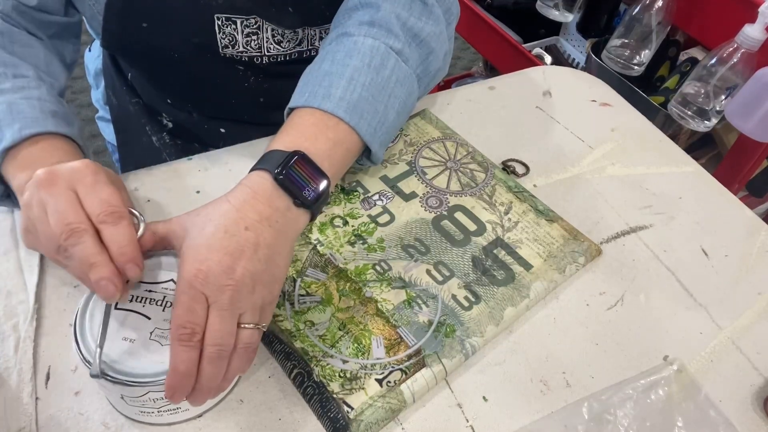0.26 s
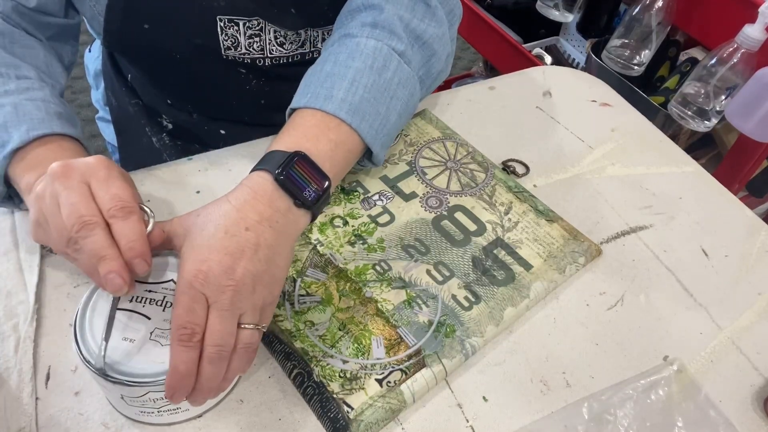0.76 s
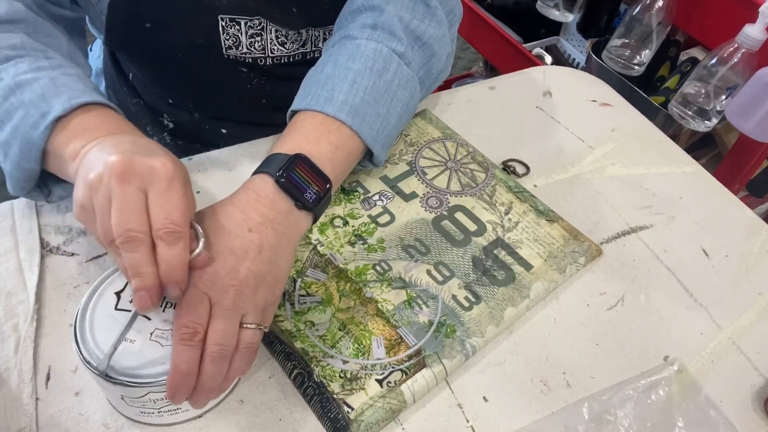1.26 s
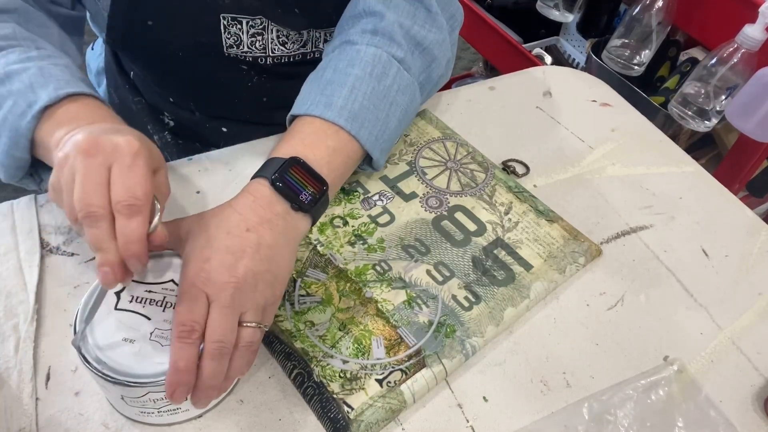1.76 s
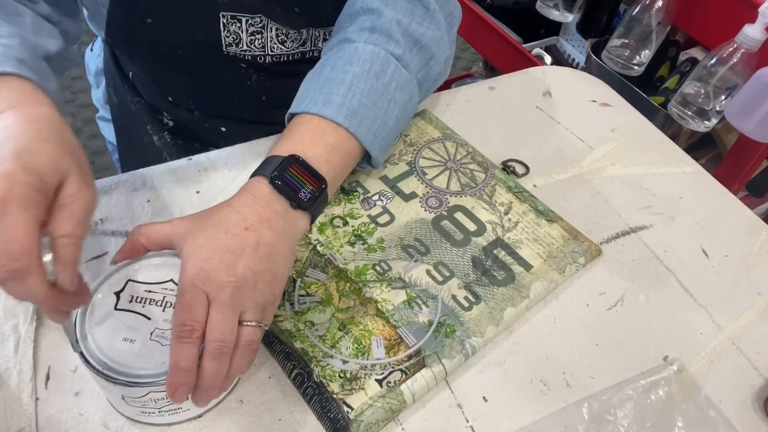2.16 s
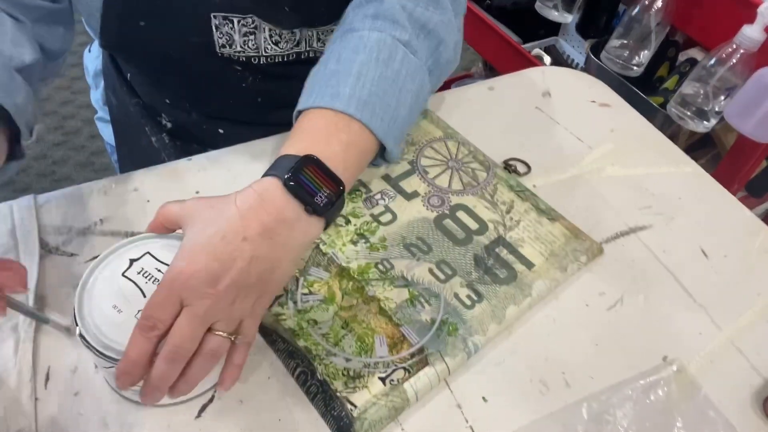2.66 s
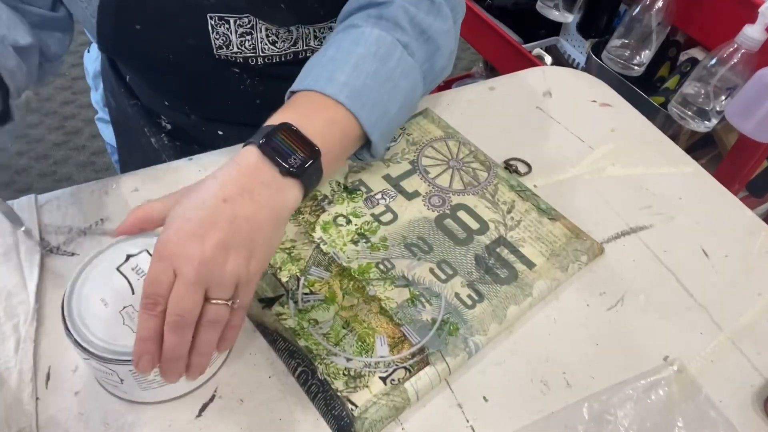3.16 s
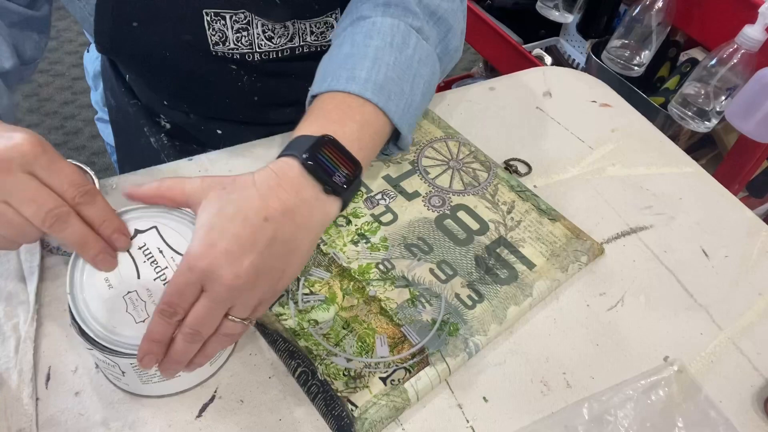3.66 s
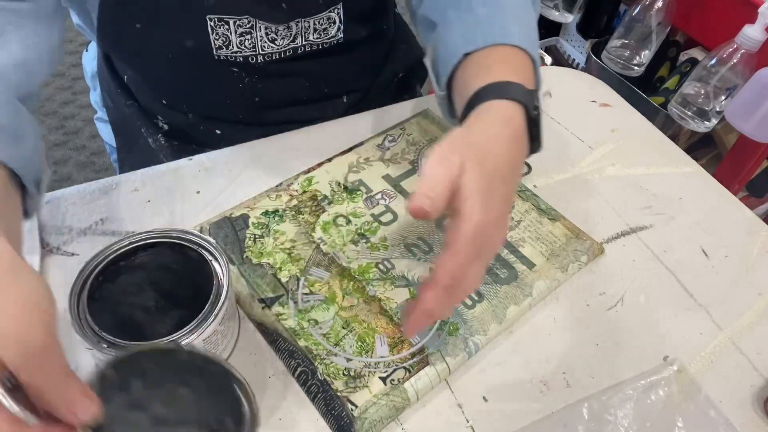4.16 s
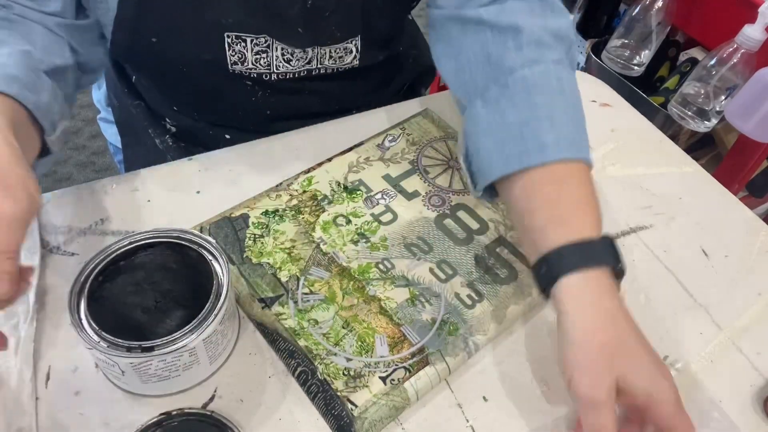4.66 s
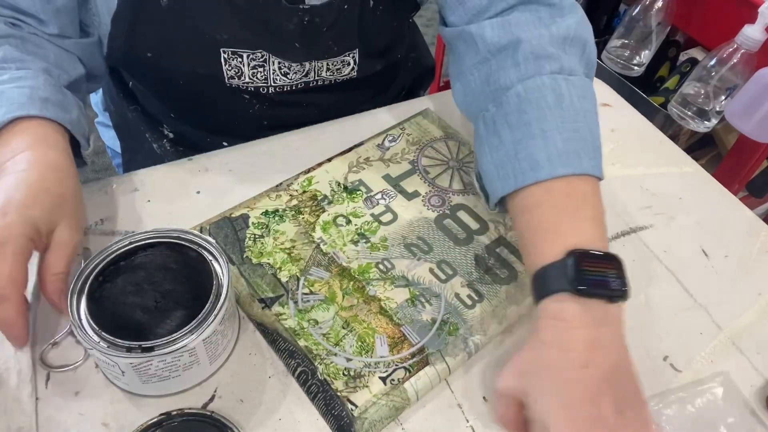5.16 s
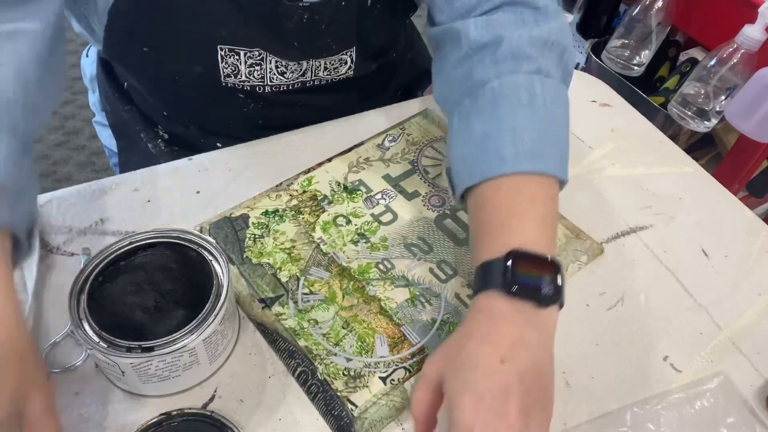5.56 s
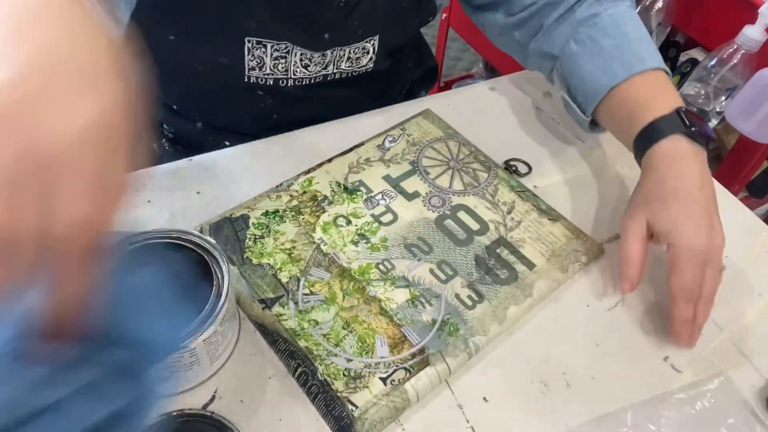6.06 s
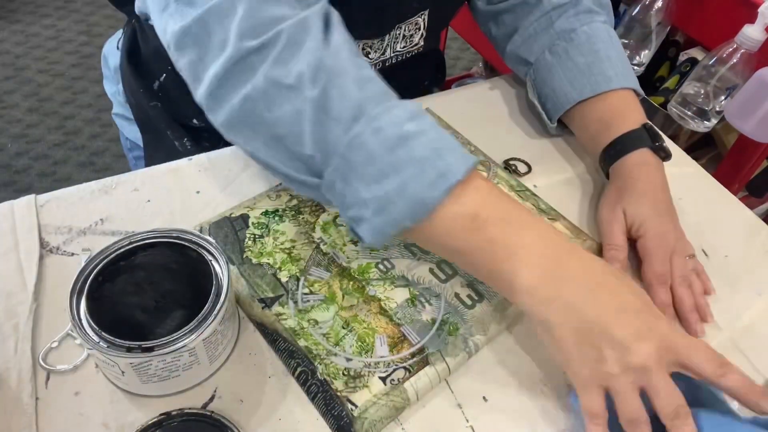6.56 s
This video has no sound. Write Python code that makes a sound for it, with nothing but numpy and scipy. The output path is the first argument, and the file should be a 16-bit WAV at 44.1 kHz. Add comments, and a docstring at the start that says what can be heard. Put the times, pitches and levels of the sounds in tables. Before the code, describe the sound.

In a small room with a faint low rumble, a steel key lightly taps and levers at a paint tin's rim, with a brief rough squeak and a bright lid ring. The tin scrapes and knocks hollowly on the table, the lid rings again and is set down with a clank, then the key clacks down. A plastic bag crinkles as cloth is pulled out and dropped. Close stereo phone microphone.

```python
"""Over low room rumble, a steel key knocks and levers at the rim of a paint tin on a table; sleeves swish later.
The key rasps and squeaks in the rim, the lid pops and rings, the tin slides, the lid rings again and
is laid down, then the key. A plastic bag crinkles to the right as a cloth is pulled from it and dropped.
Blows, lid and key ring decaying modes; rubbing is coloured grains shaped by hand speed; squeaks are bent tones."""
import sys
import numpy as np
from scipy import signal
from scipy.fft import rfft, irfft
from scipy.io import wavfile
from scipy.ndimage import uniform_filter1d

SR = 44100
rng = np.random.default_rng(int(sys.argv[2]) if len(sys.argv) > 2 else 0)


def wrap_up_sound(samples):
    """Save the sound to the file named by the first command line argument, as 16-bit audio."""
    columns = np.atleast_2d(samples).T
    # keep every value between -1 and 1, then stretch to whole-number steps
    tamed = np.clip(columns, -1, 1)
    steps = np.round(tamed * 32767).astype(np.int16)
    wavfile.write(sys.argv[1], SR, steps)


N = 299880  # length [samples]
SIDES = np.array([[1], [-1]]) / 2  # left and right halves of a stereo difference


def undb(db):
    """Decibels to gain."""
    return 10 ** (np.asarray(db) / 20)


def across(table, hz, column):
    """Read a table column on a log-frequency axis."""
    rows = np.array(table)
    return np.interp(np.log(hz + 1e-9), np.log(rows[:, 0]), rows[:, column])


def bins(size):
    """Frequencies of a real transform [Hz]."""
    return np.fft.rfftfreq(size, 1 / SR)


def colour(x, spectrum):
    """Give x a spectrum and unit rms."""
    y = irfft(rfft(x) * undb(across(spectrum, bins(N), column=1)), N)
    return y / y.std()


def band(x, low_hz, high_hz, order=4):
    """Causal band-pass."""
    edges = [low_hz, min(high_hz, SR / 2 - 1)]
    return signal.sosfilt(signal.butter(order, edges, "band", fs=SR, output="sos"), x)


def attack_level(x, db):
    """Scale x so that its first 25 ms have the given rms level."""
    return x * undb(db) / x[:SR // 40].std()


def fade(t, t60):
    """Exponential decay by 60 dB in t60 seconds."""
    return np.exp(-np.log(1000) * t / t60)


def mode(t, hz, t60):
    """One decaying sine."""
    return np.sin(2 * np.pi * hz * t) * fade(t, t60)


def add(track, s, x):
    """Mix x into the track at time s."""
    start = int(s * SR)
    track[start:start + len(x)] += x[:N - start]


def walk(rate):
    """Random wander with unit spread, given new targets at a rate in Hz."""
    k = int(SR / rate)
    steps = np.repeat(rng.standard_normal(N // k + 1), k)
    y = uniform_filter1d(steps, k)[:N]
    return y / y.std()


def grains(rate, spread_db, smooth):
    """Tiny slips of unequal size, at a mean rate per second, over a smooth rub."""
    size = undb(spread_db * np.minimum(rng.exponential(size=N), 4))
    slips = (rng.random(N) < rate / SR) * size * rng.choice([-1, 1], N)
    return slips / slips.std() + smooth * rng.standard_normal(N)


SWELL_DB = 20  # depth of a movement one rise before its peak and one fall after it


def swell(peak_s, rise_s, fall_s, steep=1):
    """Speed of one hand movement: it builds to 1 and dies away; a steep one starts abruptly."""
    t = np.arange(N) / SR - peak_s
    before = np.maximum(-t / rise_s, 0) ** steep
    distance = np.maximum(before, t / fall_s)
    return undb(-SWELL_DB * np.minimum(distance, 10))


def movements(table, column, steep=1):
    """Gain of a table of movements, weighted by its dB column; overlapping ones add in power."""
    return np.sqrt(sum((undb(row[column]) * swell(*row[:3], steep)) ** 2 for row in table))


def at_bag():
    """0 while the hands work on the tin, rising to 1 as they reach the bag at 4.4 s."""
    return np.clip((np.arange(N) / SR - 4.4) * 10, 0, 1)


# rumble of the room: (frequency [Hz], relative level [dB per Hz])
ROOM_RUMBLE = [(20, -16), (40, -5.5), (60, 11.5), (100, -8.5), (200, -6.5), (400, -17.5), (1000, -24),
               (3000, -33.5), (8000, -40), (15000, -43)]


def room_rumble(level_db=-63):
    """Steady coloured noise, partly shared between the two sides."""
    shared = rng.standard_normal(N)
    sides = [colour(shared + 1.1 * rng.standard_normal(N), ROOM_RUMBLE) for _ in range(2)]
    return undb(level_db) * np.array(sides)


# hands and arms leaning on the table: (peak [s], rise [s], fall [s], level before trim [dB])
NUDGES = [(.4, 0.82, 0.44, -58), (1.12, 0.13, 0.38, -57), (1.8, .8, 0.62, -63.5), (2.58, 0.3, 1.3, -44),
          (3.7, 2, 0.89, -50.5), (4.75, 0.36, 0.49, -56), (5.3, 0.54, 1.25, -52), (5.85, 1.8, 0.85, -50)]
# response of the table top: (frequency [Hz], relative level [dB per Hz])
TABLE_TOP = [(30, -16.5), (60, 10), (95, 8), (150, 1), (260, -11.5), (550, -16.5), (1000, -45),
             (2500, -45.5), (12000, -68.5)]


def hands(trim_db=-2):
    """Soft nudges rumble in the table top as coarse grains."""
    rumble = colour(grains(rate=59, spread_db=4.0, smooth=0.77), TABLE_TOP)
    return rumble * movements(NUDGES, column=3) * undb(trim_db)


# strokes: first a faint hiss near 1.4 s, then sleeves, then the cloth in its bag: # (peak [s], rise [s], fall
# [s], swish level [dB], crinkle level before trim [dB])
STROKES = [(1.4, 1.4, 0.44, -83.5, -85.5), (2.53, 0.22, 0.11, -57.5, -63.5), (2.78, 0.15, 0.073, -53, -53),
           (3.03, 0.06, 0.49, -64.5, -69.5), (3.47, 0.24, 1, -72.5, -72), (3.79, 0.093, 0.059, -62, -61.5),
           (4.16, 0.5, 0.69, -67, -80.5), (4.62, 0.18, 0.16, -54.5, -53.5),
           (4.96, 0.19, 0.16, -49.5, -49.5), (5.31, 0.094, 0.065, -60.5, -52),
           (5.45, 0.146, 0.32, -56, -55), (5.85, 0.56, 0.25, -64, -65.5), (6.3, 0.29, 0.38, -61, -65),
           (6.46, 0.067, 0.12, -57, -48), (6.8, 0.048, .1, -62, -65)]
# skin and sleeve rubbing on the tin, also the hiss of drags: (frequency [Hz], relative level [dB per Hz])
RUB = [(2000, -24), (4000, -7.5), (6000, -5.5), (8000, -1.5), (10000, -1.5), (13000, -2), (14600, 2.5),
       (15800, -22)]
# cloth sliding in the bag: (frequency [Hz], relative level [dB per Hz])
BAG_SWISH = [(2000, -17), (4000, -10), (6000, -4.5), (8000, -1), (10000, -2.5), (13000, -2.5),
             (14600, -11.5), (15800, -25)]
# buckling creases: (frequency [Hz], relative level [dB per Hz])
CRINKLE = [(200, -19.5), (500, 6.5), (900, 6.5), (1500, 5.5), (2500, 11), (4000, 1), (6000, -18),
           (10000, -24)]


def cloth(crinkle_trim_db=-1, flutter_db=2.5):
    """Fibres rub in a fine hiss, duller inside the bag, while creases buckle in coarser grains."""
    fibres = grains(rate=3000, spread_db=2.5, smooth=1.2)
    creases = grains(rate=220, spread_db=1.7, smooth=1.0)
    inside = at_bag()
    sleeve_hiss = (1 - inside) * colour(fibres, RUB)
    bag_hiss = inside * colour(fibres + 0.46 * creases, BAG_SWISH)
    hiss = (sleeve_hiss + bag_hiss) * movements(STROKES, column=3)
    crinkle = colour(creases, CRINKLE) * movements(STROKES, column=4) * undb(crinkle_trim_db)
    return (hiss + crinkle) * undb(flutter_db * walk(40))


# light ticks of fingertips, key and plastic film:
# (time [s], level before trim [dB], snap relative to level [dB], pop relative to level [dB])
TICKS = [(0.277, -59.5, -5, 0), (1.2465, -67, -4, -16), (2.376, -62, 4, -2.5), (2.947, -59, -7.5, -14),
         (3.782, -56.5, -14, 3), (4.5575, -39.5, -7.5, -28), (4.588, -49, 5.5, -19),
         (4.6083, -41.5, 2.5, -16.5), (4.6254, -36, -11.5, -34.5), (4.799, -40.5, -22.5, -10.5),
         (4.907, -36.5, -4.5, -14.5), (4.9991, -42, 3.5, 3), (5.0117, -52.5, 9.5, 7.5), (5.124, -50, 3, -5),
         (5.1387, -47.5, 0.5, 3), (5.2148, -46, -6, -9), (5.4036, -37, -26.5, -2.5), (5.417, -51.5, -6, 7),
         (5.4288, -42, -31, 0.5), (5.4499, -41.5, -19.5, -4), (5.4695, -46, 0.5, 1.5), (5.564, -50, -16, 0),
         (5.607, -56, -27, 5.5), (5.6315, -52, -14, 0), (5.728, -50, -8.5, 1), (6.424, -46.5, 9.5, -4),
         (6.7914, -56.5, 2.5, 13.5)]


def ticks(high_trim_db=-11, snap_trim_db=-9, pop_trim_db=-10, t60=0.017):
    """Short dry noise snaps; a buckling crease adds a lower pop."""
    out, t = np.zeros(N), np.arange(SR // 20) / SR
    for s, db, snap_db, pop_db in TICKS:
        burst = rng.standard_normal(len(t)) * fade(t, t60)
        add(out, s, attack_level(band(burst, 3700, 12000, order=2), db + high_trim_db))
        add(out, s, attack_level(band(burst, 2300, 4900, order=2), db + snap_db + snap_trim_db))
        add(out, s, attack_level(band(burst, 690, 1300, order=2), db + pop_db + pop_trim_db))
    return out


DRAG_STEEP = 2.5  # a drag breaks loose suddenly: power of its rise
JUDDER_BEND = 0.16  # share by which the judder is flatter at rest than at full speed
# drags of the key in the rim and shoves of the tin over the table: (peak [s], rise [s], fall [s],
#   hollow [dB], rasp [dB], hiss [dB], judder at full speed [Hz]); levels are before trims
DRAGS = [(1.58, 0.031, 0.08, -51, -47, -52, 599), (1.637, 0.07, 0.027, -47.5, -46.5, -48, 638),
         (2.496, 0.02, 0.078, -39, -50.5, -67, 560.5), (2.571, 0.07, 0.11, -43.5, -55, -59.5, 563.4),
         (2.671, 0.021, 0.05, -39.5, -44, -52, 346.4), (2.785, 0.031, 0.038, -41.5, -54, -65.5, 692),
         (2.839, 0.014, 0.022, -41.5, -50.5, -62, 608), (3.03, 0.055, 0.095, -56.5, -90, -56.5, 424),
         (3.183, 0.062, 0.026, -51.5, -82, -93.5, 558), (3.464, 0.022, 0.023, -36, -49.5, -50, 325),
         (4.248, 0.013, 0.018, -43, -54, -76, 630)]
# hollow of the sliding tin: (frequency [Hz], relative level [dB per Hz])
TIN_HOLLOW = [(120, -26.5), (250, 5), (390, 1), (450, 3), (550, 3), (710, 0), (820, -14.5), (1100, -17),
              (2000, -57.5)]
# resonances of the rim under the dragged key: (frequency [Hz], width [Hz], relative level [dB])
RIM = [(950, 200, 3), (1380, 260, 7.5), (1790, 400, 4), (2400, 300, -4), (3000, 220, -9.5),
       (3800, 200, -19.5)]


def judder(width_hz=70):
    """The dragged metal judders in a wavering tone whose pitch rises with speed."""
    waver = (walk(2 * width_hz) + 1j * walk(2 * width_hz)) / np.sqrt(2)
    out = np.zeros(N)
    for peak_s, rise_s, fall_s, db, _, _, hz in DRAGS:
        speed = swell(peak_s, rise_s, fall_s, DRAG_STEEP)
        phase = 2 * np.pi * np.cumsum(hz * (1 - JUDDER_BEND * (1 - speed))) / SR
        out += undb(db) * speed * (waver * np.exp(1j * phase)).real
    return out


def scrapes(hollow_db=-3, judder_db=-3, rasp_db=-1, hiss_db=-3, uneven_db=3, grind_db=2):
    """Uneven stick-slip grains sound the hollow of the tin and a finer grind rings its rim."""
    slips = grains(rate=300, spread_db=2.5, smooth=0.5) * undb(uneven_db * walk(55))
    grind = grains(rate=600, spread_db=2.2, smooth=0.45) * undb(grind_db * walk(70))
    rim = sum(undb(db) * band(grind, hz - width / 2, hz + width / 2, order=1) for hz, width, db in RIM)
    rub = colour(grind + 0.5 * rng.standard_normal(N), RUB)
    hollow = undb(hollow_db) * colour(slips, TIN_HOLLOW) * movements(DRAGS, column=3, steep=DRAG_STEEP)
    rasp = undb(rasp_db) * rim / rim.std() * movements(DRAGS, column=4, steep=DRAG_STEEP)
    hiss = undb(hiss_db) * rub * movements(DRAGS, column=5, steep=DRAG_STEEP)
    return hollow + undb(judder_db) * judder() + rasp + hiss


# key levering against the rim:
# (peak [s], rise [s], fall [s], level before flutter [dB], pitch at full speed before wander [Hz])
SQUEAKS = [(1.562, .006, 0.0066, -34, 975), (1.562, .007, 0.012, -34, 2420), (1.586, .008, 0.02, -46, 2390),
           (1.619, .016, 0.022, -44, 1440), (1.653, .005, 0.009, -31, 1440),
           (1.687, .012, .014, -53.5, 1440)]


def squeaks(overtone_db=-22, jitter=0.05, jitter_hz=600, flutter_db=3, bend=0.05):
    """Steel sticks and slips on the rim in short, rough tones that sharpen as the key speeds up."""
    out, wander = np.zeros(N), 1 + jitter * walk(jitter_hz)
    for peak_s, rise_s, fall_s, db, hz in SQUEAKS:
        speed = swell(peak_s, rise_s, fall_s, DRAG_STEEP)
        phase = 2 * np.pi * np.cumsum(hz * wander * (1 - bend * (1 - speed))) / SR
        out += undb(db) * speed * (np.sin(phase) + undb(overtone_db) * np.sin(2 * phase))
    return out * undb(flutter_db * walk(240))


def ring_modes(s, modes, level_db, tilt_db=0, waver=0.074, waver_hz=45):
    """Wavering modes build up in about a millisecond and decay; tilt is per octave above the first."""
    out, t = np.zeros(N), np.arange(SR) / SR
    build_up = 1 - np.exp(-t / 0.0004)
    for hz, db, t60 in modes:
        gain = undb(level_db + db + tilt_db * np.log2(hz / modes[0][0]))
        add(out, s, gain * mode(t, hz, t60) * build_up * (1 + waver * walk(waver_hz)[:len(t)]))
    return out


# steel key, a brief clack then a thin ring: (frequency [Hz], relative level [dB], t60 [s])
KEY_MODES = [(1020, -15.5, 0.0094), (1736, 2.5, 0.0076), (2567, 2.5, 0.0078), (2940, -0.5, 0.0047),
             (5940, -4.5, 0.0067), (8000, -8, 0.0066), (12120, -8, 0.008), (4732, -51, .5), (6600, -51, .5),
             (6920, -49, .5), (8398, -54.5, .35)]


def key_landing():
    """The key clacks against the table and rings thinly."""
    return ring_modes(5.041, KEY_MODES, level_db=-8.5)


# loose lid: (frequency [Hz], relative level [dB], t60 [s])
LOOSE_LID_MODES = [(600, 1, .25), (1200, -5.5, .26), (1340, 0.5, 0.075), (3741, -23, .11),
                   (4470, -28, 0.18), (5949, -30, .14), (7550, -21, .1), (7989, -30, .13), (9173, -34, .19)]


def lid_landing():
    """The loose lid rings its own modes as it lands on the table."""
    return ring_modes(4.2505, LOOSE_LID_MODES, level_db=-34)


# blows that leave the lid's panel free to sing:
# (time [s], level [dB], tilt [dB per octave], shimmer level [dB])
LID_RINGS = [(1.916, -43.5, 5.5, -48.5), (3.3996, -35.5, -7.5, -67.5)]
# thin panel of the lid while it sits in the rim: (frequency [Hz], relative level [dB], t60 [s])
LID_MODES = [(578.7, -0.5, 0.54), (595, -2.5, 0.45), (840, -6.5, 0.33), (1270, -17, 0.15),
             (1850, -19.5, 0.25), (2050, -20, .26), (2500, -21, .3)]
# dense shimmer of the thin sheet: (frequency [Hz], relative level [dB per Hz])
SHIMMER = [(500, 1.5), (900, 4.5), (1300, -2), (1900, 3.5), (2600, 0), (3100, -11.5), (5000, -8),
           (8000, -5), (11000, -6.5), (14000, -2.5), (15500, -17.5)]


def lid_rings(shimmer_t60=0.26):
    """The lid sings its panel modes under a decaying noise shimmer."""
    out, t = np.zeros(N), np.arange(SR) / SR
    for s, level_db, tilt_db, shimmer_db in LID_RINGS:
        out += ring_modes(s, LID_MODES, level_db, tilt_db)
        shimmer = colour(rng.standard_normal(N), SHIMMER)[:len(t)]
        add(out, s, undb(shimmer_db) * shimmer * fade(t, shimmer_t60))
    return out


# blows on tin, lid and table: (time [s], thud [dB], body [dB], hollow [dB], clank [dB], clack [dB],
#   tick [dB], contact time [ms], main low resonance [Hz], main metal resonance [Hz], freedom to ring [0-1]);
#   levels are before register trims
BLOWS = [(0.227, -84, -51.5, -49, -50, -50, -63.5, 1.45, 814, 2220, 0.23),
         (0.3066, -56, -55.5, -51, -47.5, -54, -72.5, 1.5, 666, 1940, 0.03),
         (0.497, -57, -54.5, -49, -52.5, -64.5, -75, 9.6, 620, 1020, 0.12),
         (0.531, -58.5, -51.5, -56, -65, -64, -84, 2.1, 436, 2010, 0.07),
         (0.64, -84, -51, -47, -49, -46, -55, 1.3, 620, 2180, 0.28),
         (0.6871, -53, -43.5, -45, -42.5, -49, -67.5, 1.44, 590, 2260, 0.16),
         (1.5595, -54.5, -64.5, -45, -39, -44.5, -54.5, 2.7, 650, 1790, 0),
         (1.601, -48.5, -42, -61, -61.5, -66, -69, 5.5, 150, 1460, 1),
         (1.6482, -43.5, -48, -46.5, -39, -43, -53, 1.46, 324, 1400, 0.14),
         (1.9116, -59.5, -54, -49, -39, -48.5, -48, 2.8, 640, 2400, 0),
         (1.9152, -41.5, -47.5, -29.5, -33, -33, -37, 1.04, 584, 2314, 0),
         (1.917, -33.5, -27.5, -38, -40.5, -41, -47, 1.2, 150, 1790, 0.06),
         (1.941, -36, -36.5, -53.5, -61.5, -66, -80, 2.2, 90, 850, 0.14),
         (1.988, -39, -40, -63.5, -66, -62, -91, 1.5, 163.4, 1840, 0.1),
         (2.4226, -28, -21, -55, -62, -72.5, -71.5, 1.2, 158.4, 1200, 0.23),
         (2.4678, -41.5, -40, -44, -56, -67, -70, 1.8, 610, 1286, 0),
         (2.4882, -36.5, -38, -34.5, -45, -57.5, -72, 0.9, 320, 1286, 0.05),
         (2.5, -42.5, -48, -41, -47.5, -63, -76, 1.8, 590, 1326, 0.4),
         (2.605, -59.5, -50.5, -48, -58.5, -89, -72.5, 2, 570, 1343, 0.08),
         (2.6873, -48, -49.5, -58, -37, -45, -53, 4, 595, 1450, 0.23),
         (2.7363, -51.5, -39.5, -26.5, -30, -36, -51.5, 2.07, 600, 1470, 0.08),
         (2.744, -55.5, -44, -32.5, -48, -44.5, -60, 1.5, 494, 1950, 0.04),
         (2.778, -65.5, -44, -42.5, -56, -73, -60, 1.9, 350.2, 1430, 0.14),
         (2.836, -66.5, -51.5, -45, -59, -61, -76, 4, 570, 1360, 0.4),
         (3.4002, -53, -32, -36, -40.5, -67, -70.5, 0.57, 245, 880, 0.18),
         (3.424, -44.5, -82, -49, -47.5, -55, -46.5, 2, 595, 4160, 0),
         (3.703, -65.5, -50, -53.5, -58.5, -85, -77.5, 1.9, 259, 864, 0.23),
         (4.2495, -34.5, -16, -22.5, -26.5, -50.5, -57, 3, 162, 928, 0.25),
         (4.331, -39, -31.5, -31, -28.5, -50, -66, 1.35, 705, 1100, 0.05),
         (4.3333, -33, -23.5, -33, -25, -59.5, -70, 1.4, 300, 780, 0),
         (4.697, -52.5, -47.5, -73.5, -76.5, -80, -85, 3, 153, 996, 0.1),
         (4.728, -48, -56.5, -76, -75, -86, -87, 4.4, 102, 994.4, 0.05),
         (4.85, -47, -44, -57, -77, -80.5, -77, 2.2, 272, 1000, 0),
         (4.868, -46.5, -48, -69.5, -75.5, -82.5, -88.5, 3, 108, 1000, 0.7),
         (4.902, -53.5, -45.5, -63, -71, -76, -83.5, 3, 173, 1000, 0.5),
         (4.961, -70.5, -55, -41, -42.5, -48, -63.5, 1.1, 480, 1090, 0.02),
         (4.975, -60, -49.5, -31, -55.5, -44.5, -49, 1.1, 286, 2674, 0.2),
         (4.9785, -44, -18.5, -26, -65, -51.5, -63, 2.9, 283, 1027, 0.12),
         (5.034, -46.5, -29, -46.5, -56.5, -65.5, -73, 1.5, 160, 1021, 0.14),
         (5.0411, -50.5, -36.5, -43, -36, -45, -47.5, 1.1, 271.5, 1040, 0),
         (5.045, -63, -50.5, -56, -48.5, -39, -62, 0.67, 271.5, 2710, 0.05),
         (5.054, -50.5, -33, -49, -47, -46.5, -72, 1.1, 260.5, 1764, 0.02),
         (5.0734, -53, -45, -29.5, -38.5, -63.5, -68, 1.2, 444, 862, 0.1),
         (5.077, -44.5, -29, -36.5, -55.5, -68, -71, 2, 170, 930, 0.03),
         (5.1223, -55, -30.5, -36.5, -43.5, -59, -69.5, 1.8, 240, 1005, 0.1),
         (5.163, -60, -46.5, -49, -58, -78, -80, 2, 287, 1020, 0.05),
         (6.431, -52, -37, -46.5, -42, -45, -47.5, 6.9, 130, 2206, 0.03),
         (6.449, -30, -40, -70, -64, -45.5, -52, 2.2, 114.5, 3400, 0.25)]
# six registers of a blow, thud to tick:
# (low edge [Hz], high edge [Hz], t60 of the dense ring at 2 ms contact [s], trim [dB])
REGISTERS = [(47.7, 118.7, 0.13, 1), (116, 339, 0.081, -3), (344.4, 685, 0.055, -2.5),
             (747, 1550, 0.03, -7), (1650, 3100, 0.0053, -0.5), (3450, 14000, 0.018, 4)]
# tin on the table: (frequency before detuning [Hz], relative level [dB], t60 [s])
TIN_MODES = [(61, 3.5, 0.39), (95.6, 5.5, 0.23), (150, 2.5, 0.11), (194.3, -4.5, 0.33), (271, 5, 0.077),
             (404, -10, 0.014), (579, -4.5, 0.095), (835, -8, 0.17), (970, -11.5, 0.027),
             (1197, -11.5, 0.31), (1315, -11, 0.2), (1890, -9, 0.099), (2330, -10.5, 0.073),
             (2670, -19, 0.24), (4280, -25, 0.15), (4720, -16, 0.13)]


def blows(dense_db=-2, snap=0.52, chatter=0.43, low_db=6, low_cycles=12, metal_db=3, metal_cycles=32):
    """Each blow rings shared modes, two main resonances and a dense cluster, levelled by register."""
    out, t = np.zeros(N), np.arange(SR // 2) / SR
    for s, *levels_db, contact_ms, low_hz, metal_hz, freedom in BLOWS:
        detune = 1 + 0.0069 * rng.standard_normal(len(TIN_MODES))
        tin = sum(undb(db) * mode(t, hz * d, t60) for (hz, db, t60), d in zip(TIN_MODES, detune))
        ring = freedom * tin  # a hand on the tin holds back its long modes
        ring += undb(low_db) * mode(t, low_hz, low_cycles * (0.65 + freedom) / low_hz)
        ring += undb(metal_db) * mode(t, metal_hz, metal_cycles * (0.87 + freedom) / metal_hz)
        # metal skids around the contact time, which smears the treble
        contact = t * 1000 / contact_ms
        skid = chatter * rng.standard_normal(len(t)) * 2 * contact * np.exp(1 - 2 * contact)
        build_up = 1 - np.exp(-2 * contact)
        for (low_edge, high_edge, t60, trim_db), db in zip(REGISTERS, levels_db):
            decay = fade(t, t60 * np.sqrt(contact_ms / 2))
            dense = undb(dense_db) * rng.standard_normal(len(t)) * decay * build_up
            dense[0] += snap / contact_ms  # a shorter contact snaps harder
            struck = band(ring + 6 * (dense + skid), low_edge, high_edge)
            add(out, s, attack_level(struck, db + trim_db))
    return out


# reverberation of the small room:
# (frequency [Hz], t60 [s], reverberant energy relative to direct [dB])
ROOM = [(60.3, 0.78, -11), (229, 0.64, -10.5), (527, 0.52, -5), (1320, 0.48, -9.5), (2980, 0.23, -10),
        (6975, 0.28, -13.5), (14000, 0.19, -22)]
# two microphone ports: (frequency [Hz], phase by which left leads [rad], left minus right [dB],
#   unrelated share of the room [0-1])
PORTS = [(59, 0.4, -3.5, 0.9), (196, 0.25, -4, 0.05), (535, 1.33, -3, 0.98), (1090, 0.41, -2, 1),
         (2310, 0.91, -3, 1), (4400, 0.89, -3, 1), (5820, 3.9, -10, .3), (7080, 5.54, 1.5, 0),
         (8630, 7.03, -1, 0.2), (11620, 10.92, 1, .1), (14600, 10, -2, 0)]


def room_response(gap_s=0.0046, early_db=-11, early_t60=0.036):
    """Direct sound, early table bounces that differ between the ports, and an octave-band tail."""
    t = np.arange(int(.8 * SR)) / SR
    out = np.zeros((2, len(t)))
    for hz in 44 * 2. ** np.arange(9):
        centre, share = hz * np.sqrt(2), np.sqrt(2 * hz / SR)
        apart = np.clip(across(PORTS, centre, column=3), 0, 1)
        common, separate = rng.standard_normal(len(t)), rng.standard_normal((2, len(t)))
        noise = np.sqrt(1 - apart) * common + np.sqrt(apart) * separate
        decay = fade(t, across(ROOM, centre, column=1)) * np.clip(t / gap_s - 1, 0, 1)
        tail = band(noise * decay, hz, 2 * hz)
        tail /= np.linalg.norm(tail, axis=1, keepdims=True)
        out += share * undb(across(ROOM, centre, column=2)) * tail
        early = band(rng.standard_normal(len(t)) * fade(t, early_t60), hz, 2 * hz)
        # opposite signs set the two ports apart
        out += share * undb(early_db) * apart * 2 * SIDES * early / np.linalg.norm(early)
    out[:, 0] += 1  # direct sound
    return out


def place(x, turns, pan_db):
    """A source in the room; left phase lead in turns and left-minus-right dB up to the lower treble."""
    reach = np.minimum(bins(N) / 4500, 1)
    heard = rfft(signal.fftconvolve(x[None], room_response(), axes=1)[:, :N])
    heard[0] *= np.exp(2j * np.pi * turns * reach)
    return irfft(heard * undb(SIDES * pan_db * (reach < 1)), N)


def scene():
    """Tin and sleeves in front, then the bag to the right, over the low rumble of the room."""
    background = room_rumble()
    rustle = cloth() + ticks()
    bag = place(at_bag() * rustle, turns=-1.04, pan_db=-1.5)
    slide = place(scrapes() + squeaks(), turns=0, pan_db=1.5)
    rings = key_landing() + lid_landing() + lid_rings()
    tin = place(hands() + (1 - at_bag()) * rustle + rings + blows(), turns=0, pan_db=2.0)
    return background + bag + slide + tin


# colour of the phone's microphones: (frequency [Hz], level [dB])
MICROPHONE = [(1000, 0), (2700, -3), (4200, -0.5), (6300, -2.5), (8800, -3.5), (10400, -8.5), (12000, -4),
              (14300, -4), (15800, -4.5)]


def record(dry):
    """The phone's ports colour the sound, turn its phase and tilt the balance; the top is cut."""
    phase, balance_db = across(PORTS, bins(N), column=1), across(PORTS, bins(N), column=2)
    gain = undb(across(MICROPHONE, bins(N), column=1) + SIDES * balance_db)
    heard = irfft(rfft(dry) * np.exp(1j * SIDES * phase) * gain, N)
    top_cut = signal.ellip(8, .2, 70, 15900, fs=SR, output="sos")  # low-pass edge in Hz
    return signal.sosfilt(top_cut, heard)


dry = scene()
out = record(dry)
wrap_up_sound(out)
```